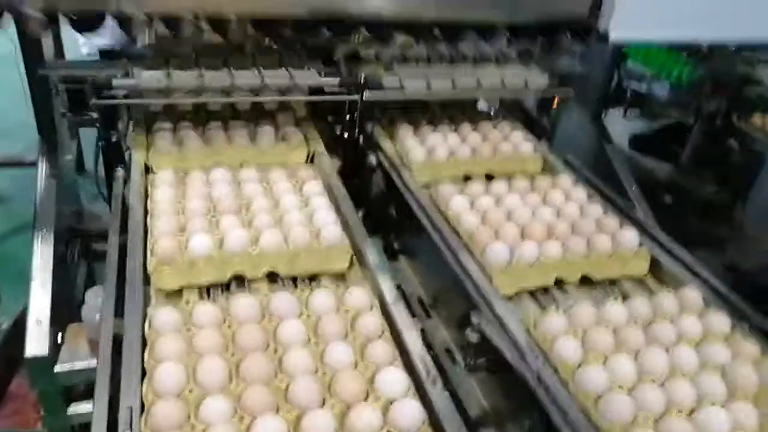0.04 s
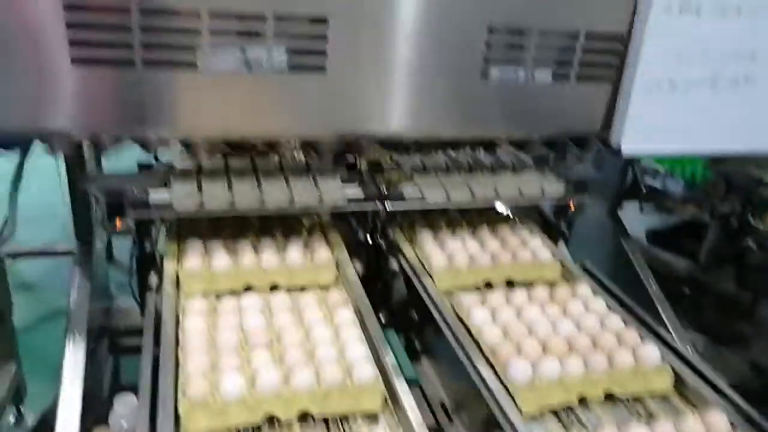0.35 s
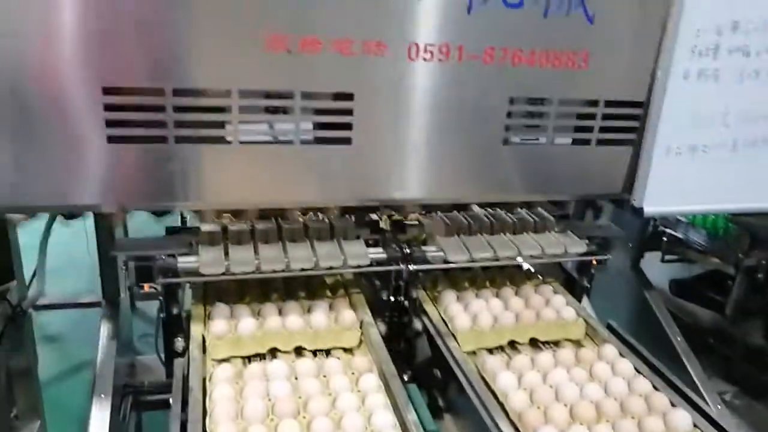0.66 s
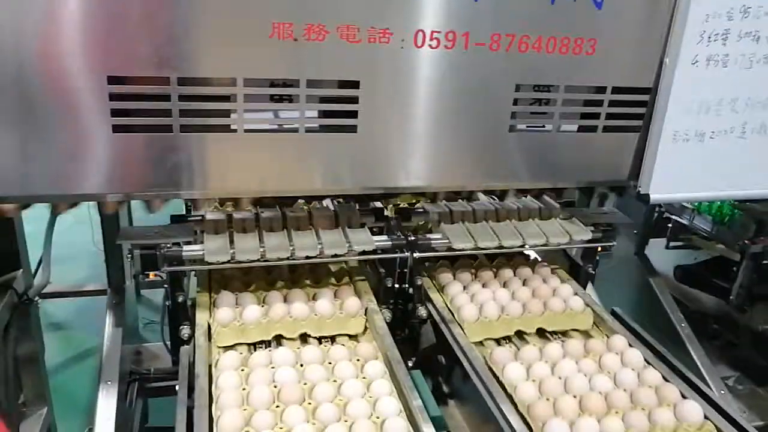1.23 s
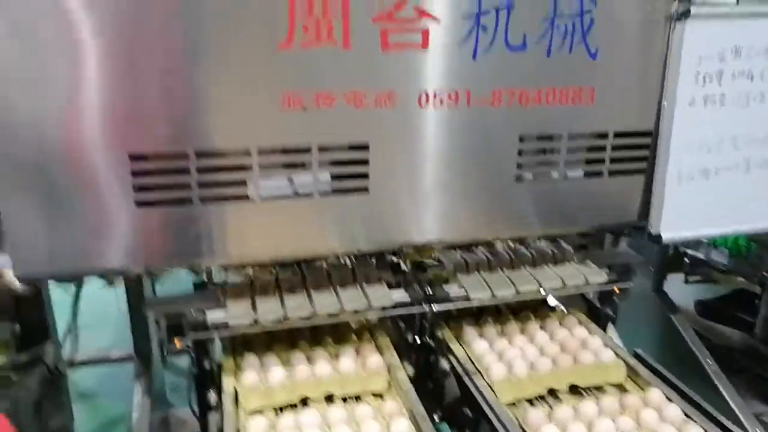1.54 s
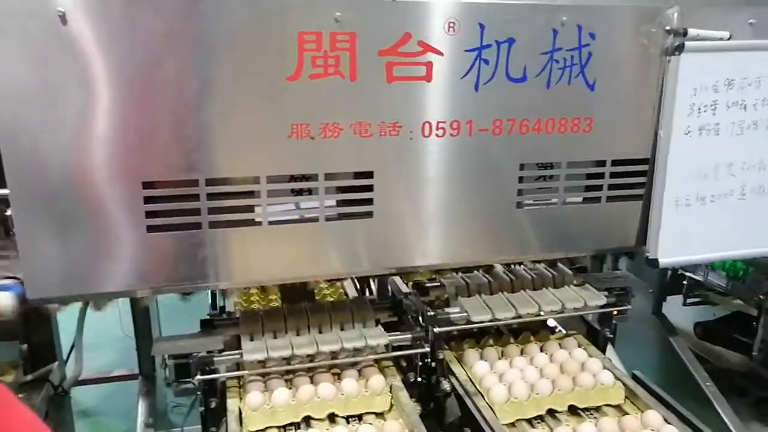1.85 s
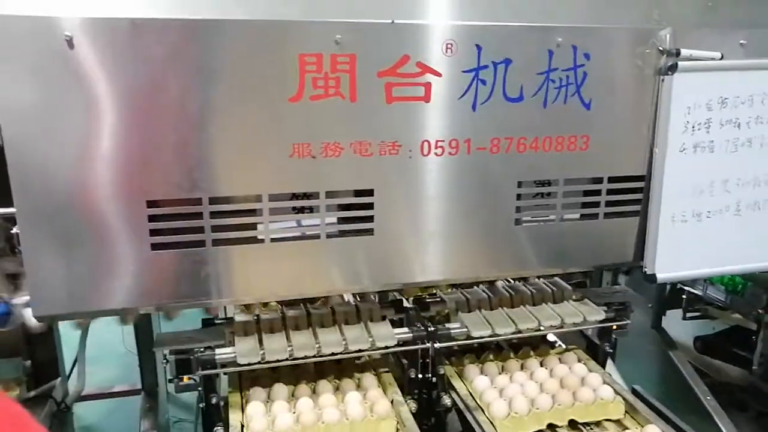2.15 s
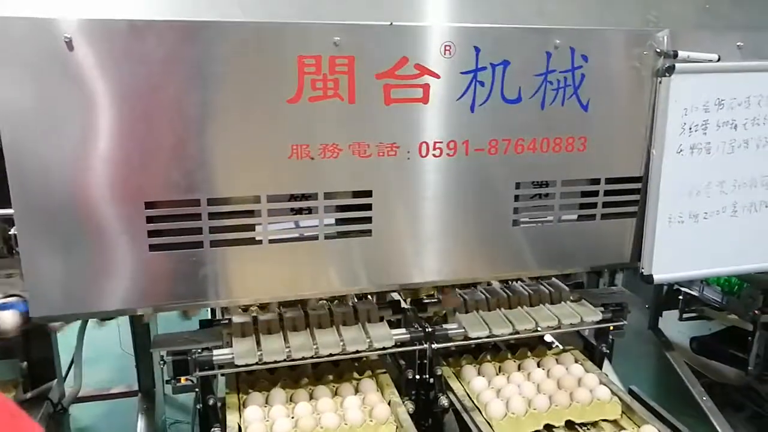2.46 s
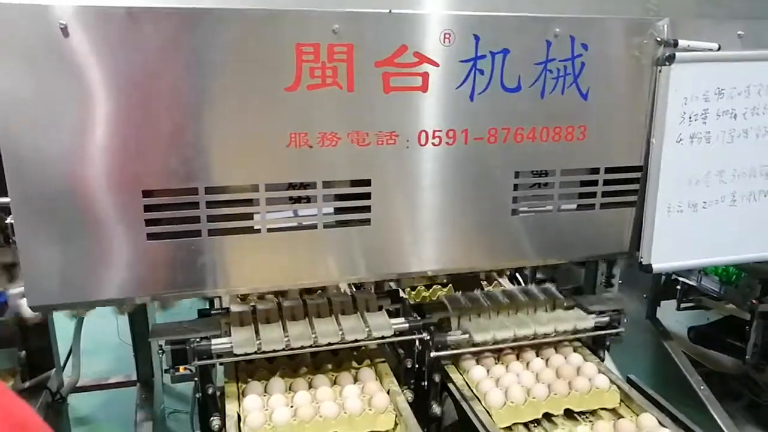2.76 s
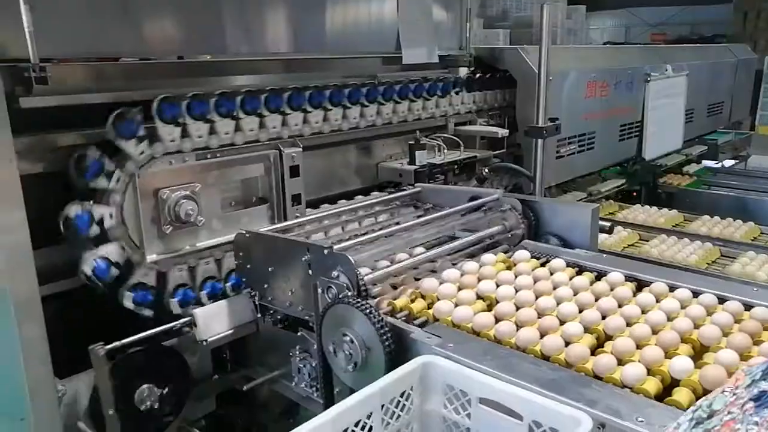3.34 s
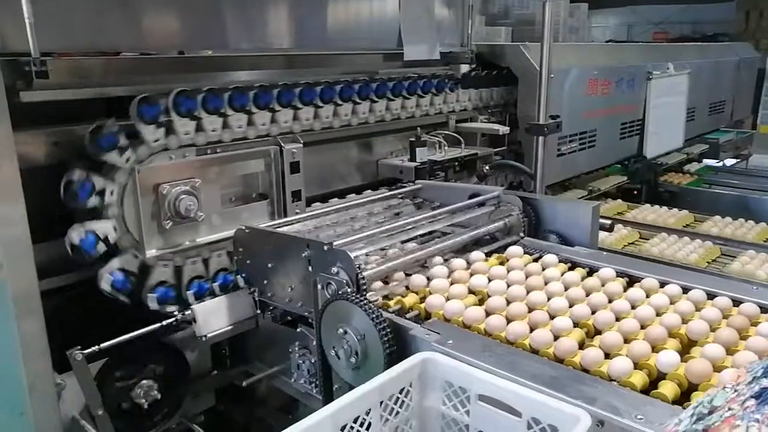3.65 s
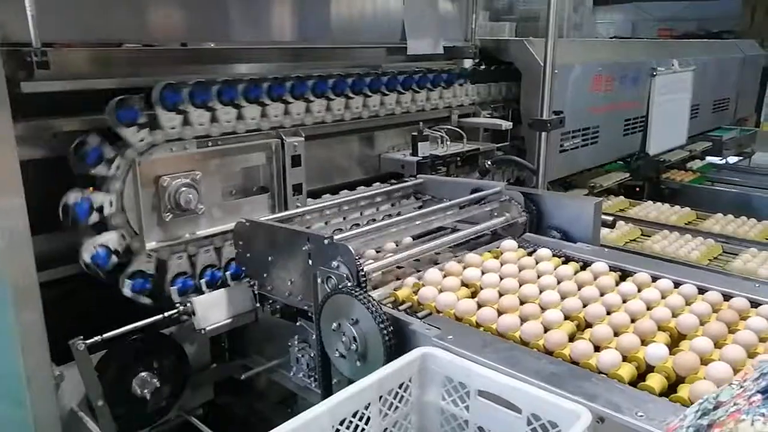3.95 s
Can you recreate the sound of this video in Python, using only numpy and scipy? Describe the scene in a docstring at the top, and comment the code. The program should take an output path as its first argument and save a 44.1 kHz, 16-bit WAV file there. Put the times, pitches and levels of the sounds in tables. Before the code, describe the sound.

An egg packing machine rumbles and hums close by in a factory hall, with chains and eggs finely rattling. Air hisses out in the first half second, then sharp clicks, clinks, clunks and faint squeaks follow. A tray drops with a double knock at 1.8 seconds. After a brief silence near 3 seconds, a conveyor rumbles and rattles, with louder hollow thumps from 3.7 to 4 seconds.

```python
"""A factory hall with an egg packing machine: first at the tray packer, then, after a short silence,
beside the roller conveyor. Drives rumble and hum under a fine rattle of chains and eggs. At the packer,
links churn, air is let off through a pipe, grippers click, thin parts clink, levers clunk, a steel stop
rings, a dry chain link squeaks and a tray drops. At the conveyor, soft heavy contacts thump the frame.
The hall answers the blows, and each of the two microphone ports colours the treble in its own way."""
import sys
import numpy as np
from scipy import signal
from scipy.fft import rfft, irfft, next_fast_len
from scipy.io import wavfile
from scipy.ndimage import map_coordinates

SR = 44100
rng = np.random.default_rng(int(sys.argv[2]) if len(sys.argv) > 2 else 0)


def unload_wav(signal):
    """Save mono or channel-first audio to the path in sys.argv[1] as 16-bit WAV at rate SR, clipped to [-1, 1]."""
    wavfile.write(
        sys.argv[1],
        SR,
        np.round(np.clip(np.atleast_2d(signal).T, -1, 1) * 32767).astype(np.int16),
    )


N = 176400
TIME = np.arange(N) / SR


def amp(db):
    return 10 ** (np.asarray(db) / 20)


def unit_rms(x):
    return x / np.sqrt(np.mean(x ** 2) + 1e-20)


def curve_at(points, hz):
    """Read (frequency, value) points on a log frequency axis."""
    freqs, values = np.transpose(points)
    return np.interp(np.log(hz + 1), np.log(freqs + 1), values)


def fader(points):
    """Gain per sample from (time [s], level [dB]) points."""
    return amp(np.interp(TIME, *np.transpose(points)))


def wobble(rate):
    """A smooth random curve, rate knots a second."""
    return map_coordinates(rng.standard_normal(4096), [TIME * rate + 2], mode='wrap')


def filtered(x, response):
    """Zero-phase EQ; response gives the gain at each frequency."""
    n = x.shape[-1]
    size = next_fast_len(n + 8192)
    return irfft(rfft(x, size) * response(np.fft.rfftfreq(size, 1 / SR)), size)[..., :n]


# Stereo image, tight in the bass and wide on top (frequency [Hz], left-right correlation [-1 to 1])
STEREO_IMAGE = [(60, 0.89), (250, 0.98), (500, 0.82), (1000, 0.018), (2000, -0.016)]
def spread(pair, eq_db):
    """Two unrelated signals become equalised stereo of rms 1."""
    def response(hz):
        angle = np.arccos(np.clip(curve_at(STEREO_IMAGE, hz), -1, 1)) / 2
        return amp(eq_db(hz)) * [np.cos(angle), np.sin(angle)]
    mid, side = filtered(pair, response)
    return unit_rms(np.array([mid + side, mid - side]))


def panned(x, pan_db):
    """Positive pan leans left."""
    return x * amp(np.array([[pan_db], [-pan_db]]) / 2)


def place(track, start_s, sound):
    part = track[:, max(0, round(start_s * SR)):][:, :sound.shape[-1]]
    part += sound[..., :part.shape[1]]


def hum(tones, waver_db):
    """Tones that wander in pitch and strength."""
    out = np.zeros(N)
    for hz, rate, db in tones:
        waver = amp(waver_db * wobble(rate))
        out += amp(db) * unit_rms(waver * np.sin(2 * np.pi * hz * TIME + wobble(2 * rate)))
    return out


def contacts(per_s, scatter_db, life_s):
    """Many short random contacts, each a decaying grain of noise."""
    chance, size = rng.random(N), rng.standard_normal(N)
    impacts = (chance < per_s / SR) * amp(scatter_db * np.clip(size, -2, 2)) ** 2
    power = signal.fftconvolve(impacts, np.exp(-TIME[:2048] / life_s))[:N]
    return unit_rms(np.sqrt(np.abs(power)) * rng.standard_normal((2, N)))


def noisy_hits(hits, width_oct, rise_s, t60):
    """Each blow rings a dense cluster of modes: a decaying band of noise."""
    out, t = np.zeros((2, N)), TIME[:SR // 4]
    envelope = np.minimum(t / rise_s, 1) * amp(-60 * np.maximum(t - 2 * rise_s, 0) / t60)
    for start, db, centre in hits:
        band_db = lambda hz: -10 * np.log10(1 + (np.log2((hz + 1) / centre) / width_oct) ** 4)
        place(out, start, amp(db) * spread(rng.standard_normal((2, len(t))), band_db) * envelope)
    return out


def pitched_hits(hits, modes, rise_s):
    """Each blow rings the modes of one part, with slightly different phases left and right."""
    out, t = np.zeros((2, N)), TIME[:SR // 4]
    for start, db in hits:
        ring = 0
        for hz, mode_db, t60 in modes:
            decay = amp(mode_db + rng.normal(0, 1.3) - 60 * t / t60)
            ring += decay * np.sin(2 * np.pi * hz * t + rng.normal(0, 0.47, (2, 1)))
        place(out, start, amp(db) * ring * (1 - np.exp(-t / rise_s)))
    return out


def drive_din(eq, clatter_db, waver_db):
    """The rush of drives with the clatter of their links."""
    rush = rng.standard_normal((2, N))
    clatter = amp(clatter_db) * contacts(per_s=140, scatter_db=0.5, life_s=0.0076)
    return spread(rush + clatter, lambda hz: curve_at(eq, hz)) * amp(waver_db * wobble(11.69))


# Tone of the packer's rumble (frequency [Hz], gain [dB])
PACKER_EQ = [(25, -17), (45, -3), (120, -2.5), (220, -1.5), (320, -1.5), (500, -6.5), (750, -12.5),
             (1300, -16), (2700, -15), (5000, -27.5), (9000, -30.5), (15000, -33)]
# Its low hum (frequency [Hz], wander rate [Hz], level [dB])
PACKER_TONES = [(93.5, 11, -44)]
def packer_drives():
    """The packer's drives lay down a bed of rumble and hum."""
    rumble = amp(-34.5) * drive_din(PACKER_EQ, clatter_db=-6.0, waver_db=0.96)
    return rumble + hum(PACKER_TONES, waver_db=3.0)


# Swells of the tray conveyor's churn (time [s], level [dB])
CHURN_FADER = [(0, -48), (.3, -55), (.4, -39.5), (.72, -39), (1.0, -43), (1.5, -44.5), (1.9, -39.5),
               (2.05, -42), (2.35, -41), (2.9, -44)]
# Body of the packer frame (frequency [Hz], width [Hz], gain [dB])
PACKER_FRAME = [(294.3, 20, -2), (330.5, 35, -1.5), (503, 72, -10.5)]
def churn():
    """Links of the tray conveyor knock about and ring the low modes of the packer frame."""
    def body_db(hz):
        peaks = [amp(db) ** 2 / (1 + (2 * (hz - centre) / width) ** 2) ** 2
                 for centre, width, db in PACKER_FRAME]
        return 10 * np.log10(sum(peaks))
    return fader(CHURN_FADER) * spread(contacts(per_s=180, scatter_db=3, life_s=0.0088), body_db)


# Waves of rattle from chains and eggs (time [s], level [dB])
RATTLE_FADER = [(0, -43), (.06, -40), (.2, -47.5), (.38, -55), (.52, -45), (.58, -50.5), (.66, -45),
                (.76, -50), (.88, -46), (.96, -45), (1.19, -43.5), (1.29, -40.5), (1.47, -43), (1.6, -50.5),
                (1.83, -43.5), (1.94, -50), (2.68, -49), (2.79, -39), (2.91, -44.5), (3.04, -46),
                (3.09, -40), (3.24, -47), (3.42, -38.5), (3.7, -43), (3.88, -57)]
# The rattle's bright tone (frequency [Hz], gain [dB])
RATTLE_EQ = [(1500, -29.5), (3500, 1.5), (5200, -2), (7300, 2), (9500, -1), (12000, -4), (15000, -13)]
def rattle():
    """Chains and eggs make small bright contacts over a softer hiss."""
    grains = contacts(per_s=300, scatter_db=3, life_s=.003)
    hiss = amp(-3.5) * rng.standard_normal((2, N))
    return fader(RATTLE_FADER) * spread(grains + hiss, lambda hz: curve_at(RATTLE_EQ, hz))


# Swell and tail of the air puff (time [s], level [dB])
AIR_FADER = [(0, -46), (.13, -34.5), (.24, -37.5), (.38, -43), (.62, -49.5), (.9, -94)]
# Tone of the pipe (frequency [Hz], gain [dB])
PIPE_EQ = [(700, -23), (1300, -14), (1500, -0.5), (1900, -2.5), (2200, -8.5), (3000, -6), (4000, -14),
           (15000, -27)]
# Its whistles (frequency [Hz], wander rate [Hz], level against the rush [dB])
PIPE_WHISTLES = [(1582, 14, -11.5), (1843, 13, -13.5)]
def air_puff():
    """Air let off through a pipe rushes out with two faint whistles."""
    rush = spread(rng.standard_normal((2, N)), lambda hz: curve_at(PIPE_EQ, hz))
    return panned(fader(AIR_FADER) * (rush + hum(PIPE_WHISTLES, waver_db=3.5)), pan_db=-2.0)


# Gripper and guide cues (time [s], relative level [dB], band centre [Hz])
CLICK_CUES = [(.047, -33, 7000), (.462, -33, 7500), (.493, -33, 8500), (.532, -35, 7700), (.548, -34, 7500),
              (.907, -34, 6900), (.934, -33.5, 7500), (.95, -35, 6700), (1.056, -41, 6800),
              (1.077, -37, 7200), (1.105, -34, 7200), (1.131, -29.5, 7000), (1.176, -43, 7200),
              (1.255, -33.5, 7200), (1.273, -30, 7500), (1.354, -34, 7000), (1.395, -35, 6800),
              (1.459, -34, 7500), (1.664, -35, 8000), (1.747, -37, 7000), (1.96, -35, 9000),
              (1.984, -29.5, 6200), (2.27, -36, 7800), (2.327, -35.5, 5830), (2.371, -34.5, 9000),
              (2.51, -37, 8500), (2.812, -35.5, 8100)]
def gripper_clicks():
    """Grippers and guides strike with a sharp, bright snap."""
    return amp(-2.5) * noisy_hits(CLICK_CUES, width_oct=0.69, rise_s=0.0011, t60=0.062)


# Taps on thin parts (time [s], level [dB], pitch [Hz])
CLINK_CUES = [(.806, -35.5, 2130), (.951, -35, 6730), (2.573, -33.5, 2540)]
def clinks():
    """Each thin part rings on its own single note."""
    t60 = 0.076
    return sum(pitched_hits([(start, db)], [(hz, 0, t60)], rise_s=0.0021) for start, db, hz in CLINK_CUES)


# Lever and guide cues (time [s], level [dB], band centre [Hz])
CLUNK_CUES = [(.977, -37, 950), (.988, -34, 950), (1.01, -39, 1100), (1.43, -45, 850), (1.822, -34.5, 900),
              (1.835, -35.5, 560), (2.712, -36.5, 900), (2.812, -35, 1110), (2.824, -36.5, 1080),
              (3.67, -34.5, 980), (3.702, -35.5, 950), (3.83, -31.5, 660), (3.866, -33.5, 596)]
def lever_clunks():
    """Levers and guides knock in the midrange with a blunt attack."""
    return noisy_hits(CLUNK_CUES, width_oct=0.7, rise_s=0.0059, t60=0.12)


# Hits on the steel stop (time [s], level [dB])
STOP_CUES = [(1.132, -33)]
# Its modes (frequency [Hz], gain [dB], t60 [s])
STOP_MODES = [(4430, -1, 0.082), (8370, 0.86, .04)]
def steel_stop():
    """A steel stop is hit and gives a short, high ping."""
    return pitched_hits(STOP_CUES, STOP_MODES, rise_s=0.0011)


# Passes of a dry chain link (time [s], level [dB], pitch [Hz])
SQUEAK_CUES = [(1.527, -47, 4930), (1.709, -47, 4900), (2.074, -45, 4370), (2.25, -45, 4900),
               (2.43, -44, 4450), (2.609, -45.5, 4280)]
def chain_squeaks(length_s=0.0273, sag_per_s=1.5, octave_db=3.5, rough_rad=2.4):
    """A dry link sticks and slips: a rough tone and its octave, sagging in pitch."""
    out, t = np.zeros((2, N)), TIME[:round(length_s * SR)]
    envelope = np.sin(np.pi * t / length_s) ** 2
    for start, db, pitch in SQUEAK_CUES:
        glide_hz = pitch * (1 - sag_per_s * (t - length_s / 2))
        phase = 2 * np.pi * np.cumsum(glide_hz) / SR
        harmonic = lambda k: np.sin(k * phase + rough_rad * wobble(500)[:len(t)])
        pair = np.array([harmonic(1) + amp(octave_db) * harmonic(2) for channel in range(2)])
        place(out, start, amp(db) * pair * envelope)
    return out


# A tray lands, then settles (time [s], level [dB])
TRAY_CUES = [(1.826, -25.5), (1.84, -25)]
# Modes of the tray's bed (frequency [Hz], gain [dB], t60 [s])
BED_MODES = [(208.5, -4.5, 0.12), (350, -5, 0.061), (530, -6, 0.14), (627, 0.5, 0.047), (740, -14, .08),
             (1306, -10.5, 0.04)]
def tray_drop():
    """A dropped tray rings its bed with a quick double knock."""
    return panned(pitched_hits(TRAY_CUES, BED_MODES, rise_s=0.00098), pan_db=3.5)


# Tone of the conveyor's rumble (frequency [Hz], gain [dB])
CONVEYOR_EQ = [(25, -12), (45, -5.5), (130, -7.5), (220, -2), (300, 4), (400, -2.5), (520, -9), (1200, -17),
               (2700, -17.5), (5000, -27), (9000, -27), (15000, -34.5)]
# Hums and narrow frame resonances (frequency [Hz], wander rate [Hz], level [dB])
CONVEYOR_TONES = [(47.9, 3.1, -41.5), (91.9, 8.4, -47), (135.2, 6, -46), (282.2, 46, -40), (385, 40, -46),
                  (1085, 14, -56)]
# Load on the drive (time [s], gain [dB])
LOAD_FADER = [(3.04, -4), (3.12, -1), (3.33, -1), (3.48, 0), (3.72, 3), (3.82, -0.5), (3.92, -3),
              (4.0, -2.5)]
# Pan from the right towards the middle (time [s], left minus right [dB])
PAN_MOVE = [(3.3, -6.5), (3.7, -1)]
def conveyor_drive():
    """The conveyor's drive rumbles and hums, louder under load."""
    rumble = amp(-30.5) * drive_din(CONVEYOR_EQ, clatter_db=-4.5, waver_db=0.27)
    drive = fader(LOAD_FADER) * (rumble + hum(CONVEYOR_TONES, waver_db=3.5))
    return drive * fader(PAN_MOVE) ** np.array([[.5], [-.5]])


def rollers(fine_rattle, ring_hz=7300, width_hz=450, boost_db=2.5):
    """The rattle rings the conveyor's rollers, off to the right, lifting one narrow band."""
    ringing = filtered(fine_rattle, lambda hz: amp(boost_db / (1 + ((hz - ring_hz) / width_hz) ** 2)))
    return panned(ringing * amp(-3.5), pan_db=-8.5)


# Hollow thumps of the conveyor (time [s], level [dB], pitch [Hz])
THUMP_CUES = [(3.715, -22.5, 274), (3.742, -18, 280), (3.842, -8.5, 419), (3.854, -20, 503),
              (3.869, -16, 456), (3.888, -9.5, 416), (3.963, -16.5, 423)]
# Modes of its frame (ratio to the pitch [x], gain [dB], t60 [s])
CONVEYOR_FRAME = [(1, -0.5, 0.03), (1.03, -14, 0.065), (.8, -22, 0.024), (1.3, -6.5, 0.024),
                  (1.7, -25.5, .035), (2.8, -19.5, 0.035)]
def conveyor_thumps():
    """Soft heavy contacts ring the low modes of the conveyor frame."""
    out = np.zeros((2, N))
    for start, db, pitch in THUMP_CUES:
        modes = [(pitch * ratio, gain, t60) for ratio, gain, t60 in CONVEYOR_FRAME]
        out += pitched_hits([(start, db)], modes, rise_s=0.0012)
    return panned(out, pan_db=-7.5)


def hall_reverb(x, t60=0.31, predelay_s=.005):
    """The hall answers with a short diffuse tail."""
    t = TIME[:SR // 2]
    tail = spread(rng.standard_normal((2, len(t))), np.zeros_like)
    tail *= amp(-60 * t / t60) * (t > predelay_s)
    return signal.fftconvolve(x, tail / np.linalg.norm(tail[0]), axes=1)[:, :N]


def scene(packer_end_s=2.917, conveyor_start_s=3.036, fade_s=.003):
    """The packer, a cut to silence, then the conveyor; only the spot effects feed the reverb."""
    packer_bed = packer_drives() + churn()
    conveyor_bed = conveyor_drive()
    fine_rattle = rattle()
    spots = gripper_clicks() + chain_squeaks() + clinks() + steel_stop()
    spots += lever_clunks() + tray_drop() + conveyor_thumps()
    spots += amp(-7.5) * hall_reverb(spots)
    at_packer = packer_bed + amp(1.0) * fine_rattle + air_puff() + spots
    at_conveyor = conveyor_bed + rollers(fine_rattle) + spots
    fade_out = np.clip((packer_end_s - TIME) / fade_s, 0, 1)
    fade_in = np.clip((TIME - conveyor_start_s) / fade_s + .5, 0, 1)
    return at_packer * fade_out + at_conveyor * fade_in


# Colour of the left and right microphone ports (frequency [Hz], gain [dB])
LEFT_PORT_EQ = [(90, -2), (400, -0.9), (1000, 2.5), (1800, -4.5), (2800, -1), (3300, -2), (3900, -7.5),
                (5000, 1), (6300, -1), (7200, -1.5), (7800, 0), (8600, 7), (9700, 1.5), (10800, -2.5),
                (14000, -3), (14900, 6.5), (15700, -10.5)]
RIGHT_PORT_EQ = [(90, 1), (400, -0.2), (1000, 4), (1800, 1.5), (2600, 5), (3300, 2), (3850, -4), (4300, -2),
                 (5200, 5.5), (6200, 4), (7200, 11), (8000, 3.5), (9200, -2.5), (11000, -3.5), (13900, 2.5),
                 (14900, 11), (15700, 3)]
def record(dry, high_cut_hz=15850):
    """Each port's resonances colour its channel, then a steep high cut trims the top."""
    coloured = filtered(dry, lambda hz: amp([curve_at(LEFT_PORT_EQ, hz), curve_at(RIGHT_PORT_EQ, hz)]))
    return filtered(coloured, lambda hz: np.clip((high_cut_hz - hz) / 200 + .5, 0, 1))


dry = scene()
out = record(dry)
unload_wav(out)
```